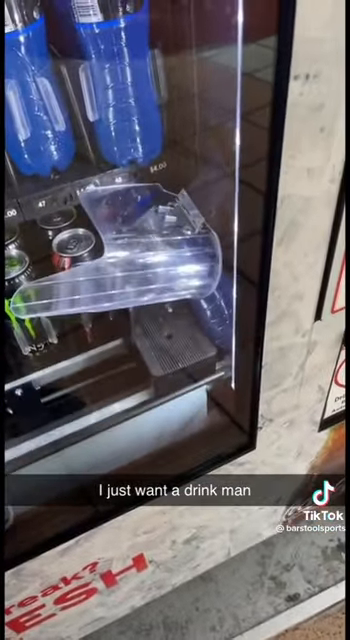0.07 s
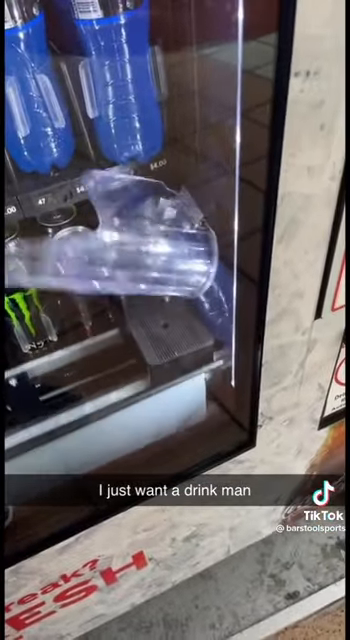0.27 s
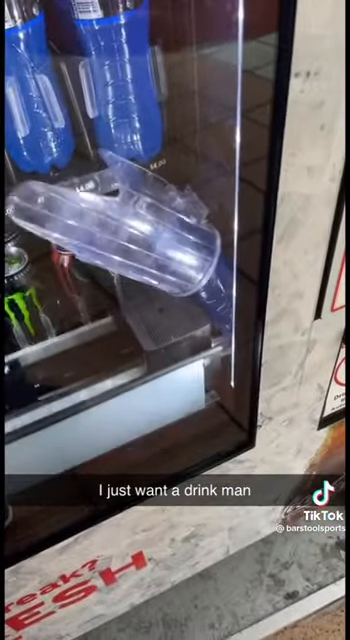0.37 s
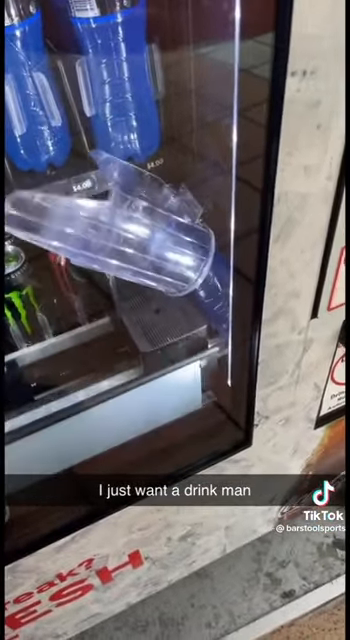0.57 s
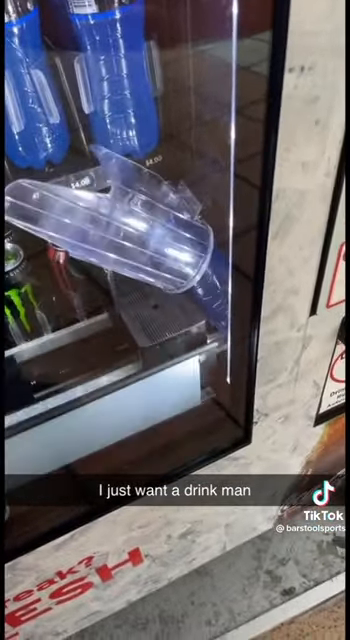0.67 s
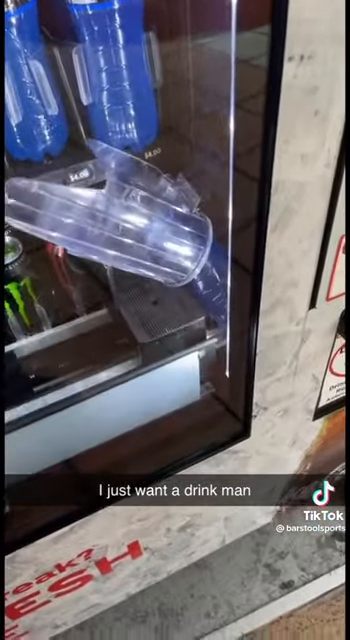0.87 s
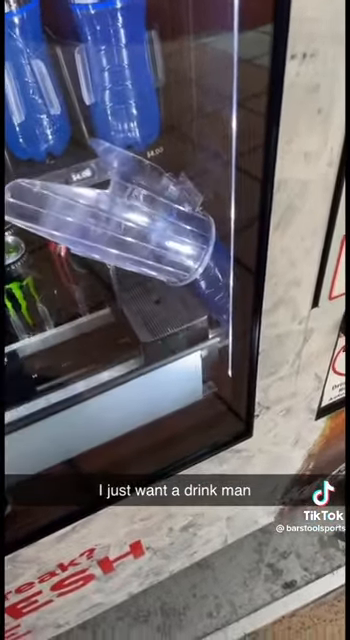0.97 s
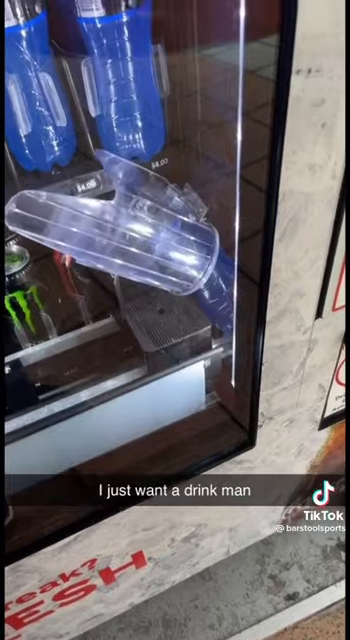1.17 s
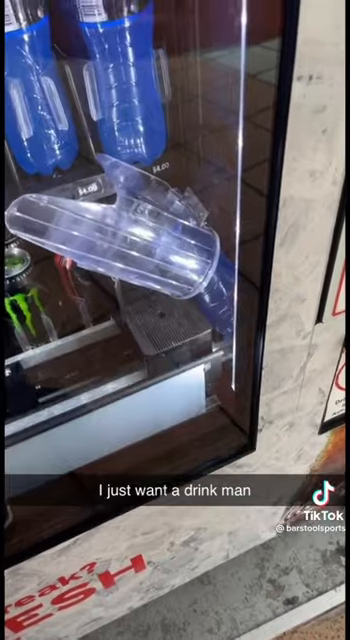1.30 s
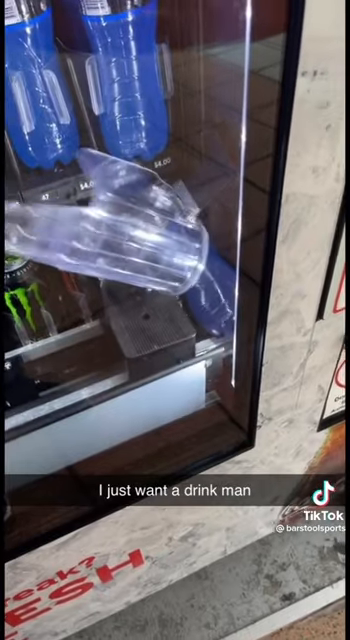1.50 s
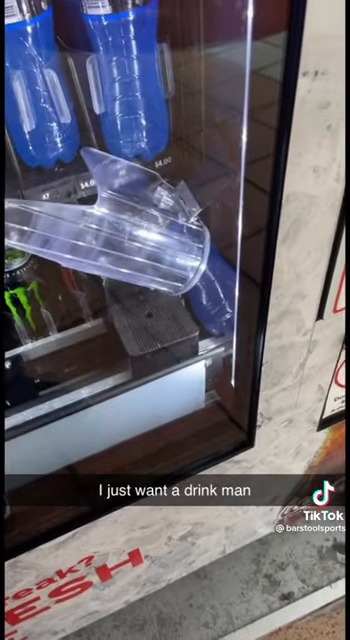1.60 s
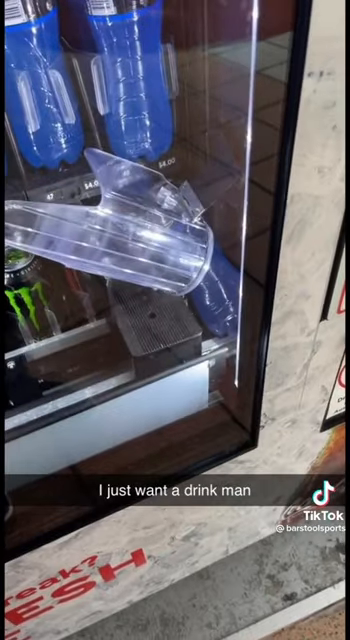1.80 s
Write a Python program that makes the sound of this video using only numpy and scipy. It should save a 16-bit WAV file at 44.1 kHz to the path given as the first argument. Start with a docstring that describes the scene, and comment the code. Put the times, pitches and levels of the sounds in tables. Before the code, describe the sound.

Loud mechanical grinding and rattling of a vending machine's moving arm, fading to a weaker clatter over hum

```python
"""Inside a vending machine with a glass door, the delivery arm makes a loud stroke and then a softer one.
Random contacts of gears and rollers excite resonant cabinet panels and small parts; guides hiss and squeak.
A whine rises into the first stroke, a motor whirrs and a growl wanders: tones with slight random modulation.
Teeth ping as decaying sines, loose parts tick as noise bursts, the carriage's knocks ring damped modes.
The cooling unit adds filtered noise and a wavering sine hum; the loudest peaks overload."""
import sys
import numpy as np
from scipy import signal
from scipy.fft import rfft, irfft, next_fast_len
from scipy.io import wavfile

SR = 44100
rng = np.random.default_rng(int(sys.argv[2]) if len(sys.argv) > 2 else 0)


def volts_from_db(level):
    """Convert decibel levels to linear amplitude ratios."""
    exponent = np.asarray(level, float) / 20
    return 10 ** exponent


def master_out(mix):
    """Clip the mix to full scale and print it as 16-bit PCM to the path in sys.argv[1]."""
    frames = np.transpose(np.atleast_2d(mix))
    ceiling = np.clip(frames, -1, 1)
    pcm = np.round(ceiling * 32767).astype(np.int16)
    wavfile.write(sys.argv[1], SR, pcm)


N = 81585
FADE_S = 0.003  # linear fade at both ends of a movement

# relative spectrum of ticking and clattering parts: (frequency [Hz], level [dB per Hz])
TICK_SPECTRUM = [(710, -18.5), (1200, -15.5), (1790, -1), (2120, -6.5), (4940, -12.5), (5990, -12),
                 (8420, -22.5), (9680, -34.5), (12600, -60), (21300, -120)]


def rms_one(x):
    """Normalisation: divide by the root of the mean square."""
    return x / np.sqrt(np.mean(x ** 2) + 1e-20)


def in_time(rows):
    """Linear interpolation: the columns of a curve table, sample by sample."""
    s, *columns = np.transpose(rows)
    return [np.interp(np.arange(N) / SR, s, c) for c in columns]


def fade(rows):
    """Gating: one between the first and last row of a table, with short ramps inside both ends."""
    t = np.arange(N) / SR
    nearest_end_s = np.minimum(t - rows[0][0], rows[-1][0] - t)
    return np.clip(nearest_end_s / FADE_S, 0, 1)


def drift(corner_hz):
    """Low-pass noise: two equal poles leave slow random motion, rms about 1."""
    hold = 40  # samples between computed points
    r = np.exp(-2 * np.pi * corner_hz * hold / SR)
    chance = rng.standard_normal(N // hold + 2002)
    slow = signal.lfilter([1], [1, -2 * r, r * r], chance)[2000:]  # the filter has settled
    return np.interp(np.arange(N) / hold, np.arange(len(slow)), rms_one(slow - slow.mean()))


def ring(x, hz, t60):
    """Damped resonance: a unit click sets a decaying sine of initial height 1 ringing."""
    r, w = volts_from_db(-60 / (t60 * SR)), 2 * np.pi * hz / SR
    return signal.lfilter([0, np.sin(w)], [1, -2 * r * np.cos(w), r * r], x + 1e-18)


def coloured(x, spectrum):
    """Spectral filtering: weight x by a table, -120 dB outside it; rms 1."""
    size = next_fast_len(N)
    hz = np.arange(size // 2 + 1) * SR / size
    at, db = np.transpose(spectrum)
    gain = volts_from_db(np.interp(np.log(hz + 1), np.log(at), db, -120, -120))
    return rms_one(irfft(rfft(x, size) * gain, size)[:N])


def narrow(rows, width_hz):
    """Narrow-band modulation: random sidebands roughen a tone that follows a level and a pitch."""
    level_db, hz = in_time(rows)
    phase = 2 * np.pi * np.cumsum(hz) / SR
    tone = (8.4 + drift(width_hz)) * np.sin(phase) + drift(width_hz) * np.cos(phase)
    return volts_from_db(level_db) * rms_one(tone) * fade(rows)


def contacts():
    """Impact excitation: sparse uneven blows of teeth and rollers over a noise bed of friction."""
    per_s, spread_db, share = 700, 4, 0.58  # share: rms of the blows relative to friction
    sizes = volts_from_db(spread_db * np.minimum(rng.exponential(1, N), 4)) * rng.choice([-1, 1], N)
    struck = rng.random(N) < per_s / SR
    return share * rms_one(sizes * struck) + rng.standard_normal(N)


def shaken(push, modes, spectrum, share_db):
    """Modal superposition: resonances swaying in strength over a broad cabinet response; rms 1."""
    sway_db = 3.5
    rings = sum(volts_from_db(db + sway_db * drift(4.6)) * rms_one(ring(push, hz, t60)) for hz, db, t60 in modes)
    return rms_one(volts_from_db(share_db) * rms_one(rings) + coloured(push, spectrum))


def cooling():
    """Broadband and tonal radiation: fan and compressor noise, faint resonances and a wavering mains hum."""
    # course of the drone: (time [s], level [dB])
    drone_level = [(0, -26.5), (.065, -26), (.12, -23.5), (.2, -24.5), (.5, -22), (.9, -27), (.95, -25.5),
                   (1.03, -25), (1.13, -27.5), (1.3, -26), (1.62, -26.5), (1.72, -26), (1.85, -27)]
    # relative spectrum of the drone: (frequency [Hz], level [dB per Hz])
    drone_spectrum = [(20, -34.5), (38, -5.5), (69, -6), (81, -7.5), (102, 0.5), (125, -6), (273, -9),
                      (340, -16.5), (520, -12), (1130, -25), (1390, -31), (2220, -32.5), (7470, -50.5),
                      (9680, -63), (12600, -106), (21300, -120)]
    # faint tones in the drone: (frequency [Hz], level [dB], decay by 60 dB [s])
    fan_tones = [(455, -19, .1), (545, -15, .1), (970, -25, .4)]
    # wavering hum: (time [s], rms level [dB], frequency [Hz])
    hum_course = [(0.0, -45, 100.5), (0.036, -54, 98.73), (0.206, -49, 102.8), (0.242, -40, 100.9),
                  (0.354, -23.5, 94.5), (0.4, -40.5, 92.9), (0.52, -40.5, 98.43), (0.9, -40, 98.37),
                  (0.932, -67, 100.9), (0.978, -25.5, 100.8), (1.066, -23, 101.1), (1.204, -44, 98.46),
                  (1.246, -29.5, 100.8), (1.57, -31, 101.7), (1.606, -54, 103.6), (1.648, -24.5, 101),
                  (1.74, -23.5, 102), (1.85, -27.5, 103)]
    level_db, = in_time(drone_level)
    hum_db, hum_hz = in_time(hum_course)
    air = rng.standard_normal(N)
    tones = sum(volts_from_db(db) * rms_one(ring(air, hz, t60)) for hz, db, t60 in fan_tones)
    drone = volts_from_db(level_db + 1.0 * drift(2.1)) * (coloured(air, drone_spectrum) + tones)
    hum = np.sqrt(2) * volts_from_db(hum_db) * np.sin(2 * np.pi * np.cumsum(hum_hz) / SR)
    return drone + hum


def rising_whine():
    """Frequency glide: a faint narrow-band tone climbs into the first stroke."""
    # rising whine: (time [s], level [dB], frequency [Hz])
    whine = [(0, -60, 648), (.12, -52, 700), (.17, -37, 731), (.2, -36, 776), (.235, -35, 783),
             (.26, -85, 872)]
    return narrow(whine, 8.1)


def knocks():
    """Impulse response: the carriage hits its stops and rings frame modes of varying strength."""
    # blows on the stops: (time [s], level ahead of the low-pass [dB])
    blows = [(.238, -12), (0.063, -20), (0.796, -18), (0.841, -25.5), (1.308, -23.5), (1.339, -19),
             (1.575, -27)]
    # modes of the frame: (frequency [Hz], level [dB], decay by 60 dB [s])
    frame_modes = [(139, -5.5, 0.13), (192.6, 2, 0.089), (325, 3, 0.055), (470, -8, 0.085),
                   (718, -1.5, 0.038), (980, -18.5, .03)]
    s, db = np.transpose(blows)
    out, chance = 0, rng.standard_normal((len(s), len(frame_modes)))
    for k, (hz, level_db, t60) in enumerate(frame_modes):
        clicks = np.zeros(N)
        clicks[(s * SR).astype(int)] = volts_from_db(db + level_db + 2 * chance[:, k])
        out = out + ring(clicks, hz, t60)
    return signal.lfilter([.2], [1, -.8], out)  # one-pole low-pass dulls the blows


def ticks():
    """Decaying noise: each loose part gives a bright rustle that dies away, a weaker, shorter crack at its start."""
    # loose parts tick: (time [s], level [dB], decay of the rustle by 60 dB [s])
    events = [(0.099, -31.5, 0.07), (0.189, -35, 0.045), (0.2372, -22, 0.014), (0.2456, -13, 0.025),
              (0.7286, -15, 0.058), (0.9135, -33.5, 0.25), (0.9986, -31, 0.1), (1.071, -27.5, 0.092),
              (1.087, -40, 0.076), (1.2492, -23.5, 0.097), (1.717, -35.5, 0.63)]
    t, shape = np.arange(N) / SR, 0
    for s, db, t60 in events:
        age = np.maximum(t - s, 0)
        rustle = volts_from_db(db - 8.5 - 60 * age / t60)
        crack = volts_from_db(db - 19.5 - 60 * age / 0.007)
        shape = shape + (rustle + crack) * np.clip(age / 0.0014, 0, 1)
    return shape * coloured(rng.standard_normal(N), TICK_SPECTRUM)


def arm():
    """Forced vibration: one train of contacts drives panels, small parts and the hiss of the guides."""
    # the two strokes, one list each:
    # (time [s], deep rumble [dB], middle rumble [dB], grinding [dB], hiss [dB])
    strokes = [
        [(0.236, -24.5, -14, -19, -43), (0.246, -8, -11.5, -27.5, -30), (0.26, -15.5, -21.5, -37, -38.5),
         (0.288, -15, -15, -26, -33.5), (0.368, -14.5, -15, -28, -33), (0.384, -19, -9, -23, -32.5),
         (0.43, -19, -21.5, -34, -37.5), (0.44, -13, -16.5, -24, -36), (0.474, -24.5, -17, -30, -40),
         (0.5, -10.5, -15.5, -27, -33), (0.546, -17, -10, -23, -30), (0.566, -12, -24.5, -27.5, -39),
         (0.578, -7.5, -9.5, -26.5, -30), (0.606, -12.5, -19, -28, -37), (0.66, -16, -13.5, -25, -31),
         (0.752, -11.5, -19, -30.5, -36.5), (0.77, -16, -32, -35.5, -43.5), (0.79, -21.5, -24, -39, -48),
         (0.825, -29, -45.5, -65, -57.5), (0.9, -35, -41, -59, -54.5)],
        [(1.17, -37, -48, -46, -59), (1.2, -26, -37.5, -52, -58), (1.235, -39, -53, -48, -57),
         (1.256, -24, -36.5, -50, -53), (1.282, -31, -55, -47, -49.5), (1.3, -21, -26, -33.5, -38.5),
         (1.346, -27.5, -40, -41.5, -43.5), (1.372, -33, -35.5, -47, -50), (1.42, -23.5, -32, -39.5, -40),
         (1.52, -22.5, -36, -40, -44.5), (1.572, -27.5, -36.5, -44, -48), (1.592, -20.5, -50, -52, -60)],
    ]
    # cabinet panels and small parts: (frequency [Hz], level [dB], decay by 60 dB [s])
    deep_panels = [(146, -8.5, 0.073), (202, -2.5, 0.12), (223.8, 1, 0.08), (389, -11, 0.023)]
    middle_panels = [(620, -3.5, 0.1), (679.3, 1.5, 0.24), (865, -8, 0.41), (968, -2.5, 0.092),
                     (1078, -14, 0.018), (1228, -7.5, 0.19), (1356, -7, 0.035), (1425, -8.5, 0.051)]
    small_parts = [(1725, 6, 0.18), (2213, 4.5, 0.13), (2310, -14.5, 0.15), (2768, -4.5, 0.24),
                   (2990, 1.5, 0.44), (3460, 0.5, 0.087)]
    # relative spectra of the broad responses and the hiss: (frequency [Hz], level [dB per Hz])
    deep_spectrum = [(41, -46), (70, -40.5), (275, -4), (404, -3.5), (462, -6.5), (520, -13), (680, -21),
                     (1140, -120)]
    middle_spectrum = [(290, -23.5), (510, 0.5), (593, -7.5), (679, 2), (969, 3.5), (1600, -12.5),
                       (2080, -23), (3520, -120)]
    grind_spectrum = [(820, -22), (1450, 0), (1990, -4.5), (2450, -4.5), (3710, -15), (4200, -56.5),
                      (9240, -120)]
    hiss_spectrum = [(2240, -20.5), (3800, -7), (3950, -2), (5580, -2.5), (7130, -9), (9270, -19),
                     (9680, -10.5), (12600, -58.5), (16000, -120)]
    panel_share_db, part_share_db = -5.5, -9  # resonances relative to the broad response
    gains = np.zeros((4, N))
    for rows in strokes:
        gains += fade(rows) * volts_from_db(np.array(in_time(rows)))
    push, chatter = contacts(), volts_from_db(0.28 * drift(40.0))
    deep = shaken(push, deep_panels, deep_spectrum, panel_share_db)
    middle = shaken(push, middle_panels, middle_spectrum, panel_share_db)
    grind = shaken(push, small_parts, grind_spectrum, part_share_db)
    hiss = coloured(push, hiss_spectrum)
    upper = gains[1] * middle + gains[2] * grind + gains[3] * hiss
    return gains[0] * deep + chatter * upper


def whirr():
    """Narrow-band modulation: the motor's rough tone shifts in level and pitch."""
    # motor whirr: (time [s], level [dB], frequency [Hz])
    course = [(.236, -21, 470), (.29, -24, 470), (.325, -13, 490.5), (.345, -7.5, 458.7),
              (.375, -15.5, 478.7), (.41, -13, 470), (.44, -23, 470), (.48, -15.5, 448),
              (.51, -15.5, 444.5), (.54, -14, 467.8), (.59, -19.5, 454), (.625, -21.5, 467),
              (.66, -9, 472.5), (.695, -19, 430.6), (.75, -34.5, 450.7), (.8, -30, 463.6), (.86, -42, 461)]
    return narrow(course, 19)


def pings():
    """Modal decay: a passing tooth scrapes, clatters and rings one small part, each mode slightly detuned."""
    # passing teeth: (time [s], level [dB], extra level of the upper modes [dB])
    teeth = [(0.266, -25.5, 1), (0.389, -33, 12), (0.436, -18.5, 5.5), (0.501, -16.5, 1), (0.561, -12.5, 5),
             (.635, -23.5, 6.5), (0.688, -19, 8), (.754, -24.5, 4), (1.295, -27, -3.5), (1.333, -36, 2),
             (1.395, -30.5, 9), (1.415, -28, -2), (1.431, -27.5, -6), (1.494, -26, 4.5), (1.54, -32, 6),
             (1.565, -32.5, -4)]
    # modes of the part: (frequency before detuning [Hz], level [dB], decay by 60 dB [s])
    part_modes = [(2476, 1, .022), (2850, -4, .016), (3300, -10, .012), (4600, -16, .012), (5066, -12, .02),
                  (5600, -15, .012)]
    scrape_s, upper_from_hz = .003, 2700  # scrape_s: time constant of the rise
    detune, clatter_db = .02, -10  # detune: rms fraction of the frequency
    t, shape, out = np.arange(int(.03 * SR)) / SR, np.zeros(N), np.zeros(N)
    hz, level_db, t60 = np.transpose(part_modes)[:, :, None]
    chance = rng.standard_normal((len(teeth), len(part_modes), 1))
    rise = 1 - np.exp(-t / scrape_s)
    for (s, db, upper_db), off in zip(teeth, chance):
        span = slice(int(s * SR), int(s * SR) + len(t))
        gains = volts_from_db(db + level_db + upper_db * (hz > upper_from_hz) - 60 * t / t60)
        sines = np.sin(2 * np.pi * hz * (1 + detune * off) * t)
        out[span] += 2 * rise * np.sum(gains * sines, axis=0)
        # the clatter decays half as fast as the first mode
        shape[span] += rise * volts_from_db(db + clatter_db - 60 * t / t60[0] / 2)
    return out + shape * coloured(rng.standard_normal(N), TICK_SPECTRUM)


def growl():
    """Narrow-band modulation: a rough low tone wanders in pitch during each stroke."""
    # growl, one list for each stroke: (time [s], level [dB], frequency [Hz])
    courses = [
        [(.27, -28, 262), (.31, -19.5, 290.4), (.366, -17.5, 314.5), (.42, -16.5, 283.2), (.52, -19, 271.8),
         (.574, -20, 282.1), (.626, -20, 320), (.68, -21.5, 278.8), (.74, -34.5, 312), (.81, -39, 306.5)],
        [(1.295, -46, 340), (1.32, -21, 320.8), (1.345, -28.5, 327), (1.37, -45, 321.1), (1.45, -33, 286.4),
         (1.48, -18, 294.5), (1.52, -32, 342.2), (1.575, -32, 318), (1.6, -39, 300)],
    ]
    return sum(narrow(rows, 19) for rows in courses)


def squeak():
    """Friction tone: a scraping plastic guide is heard as a high narrow band."""
    # guide squeak: (time [s], level [dB], frequency [Hz])
    course = [(1.411, -37, 5680), (1.44, -48, 5750)]
    return narrow(course, 150)


def room(x):
    """Reverberation: convolution with a dull, exponentially decaying noise tail."""
    t60_s, gap_s = 0.36, .008
    t = np.arange(int(.5 * SR)) / SR
    dull = signal.lfilter([.4], [1, -.6], rng.standard_normal(len(t)))
    tail = dull * volts_from_db(-60 * t / t60_s) * (t > gap_s)
    return signal.fftconvolve(x, tail / np.sqrt(np.sum(tail ** 2)))[:N]


def scene():
    """Superposition: moving parts and their reverberation add to the cooling unit."""
    room_db = -18
    moving = rising_whine() + knocks() + ticks() + arm() + whirr() + pings() + growl() + squeak()
    return (moving + volts_from_db(room_db) * room(moving) + cooling())[None]


def top_cut(x):
    """Nothing passes above the cut-off."""
    return signal.sosfilt(signal.butter(12, 9830, fs=SR, output="sos"), x)


def record(dry):
    """Band limiting and saturation: top and bottom are cut, then peaks are rounded and clipped."""
    stop_hz, bass_cut_hz = 10130, 68  # 40 dB down from stop_hz upward
    soft_top, overload = 2.0, 1.0  # amplitudes: asymptote of the rounding, hard limit
    dull = signal.sosfilt(signal.cheby2(10, 40, stop_hz, fs=SR, output="sos"), dry)
    thin = signal.sosfilt(signal.butter(2, bass_cut_hz, "high", fs=SR, output="sos"), dull)
    rounded = soft_top * np.tanh(thin / soft_top)
    mix = np.clip(rounded, -overload, overload)
    return top_cut(mix)


dry = scene()
out = record(dry)
master_out(out)
```